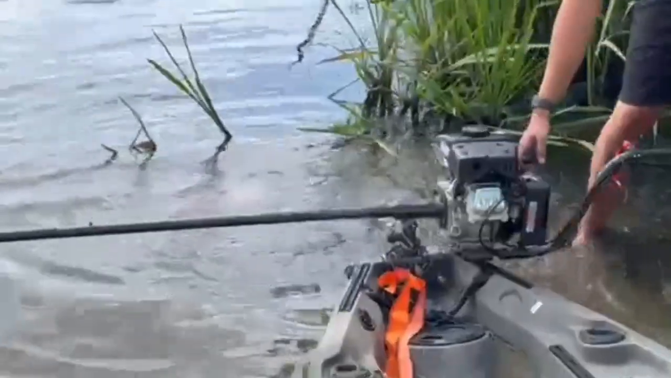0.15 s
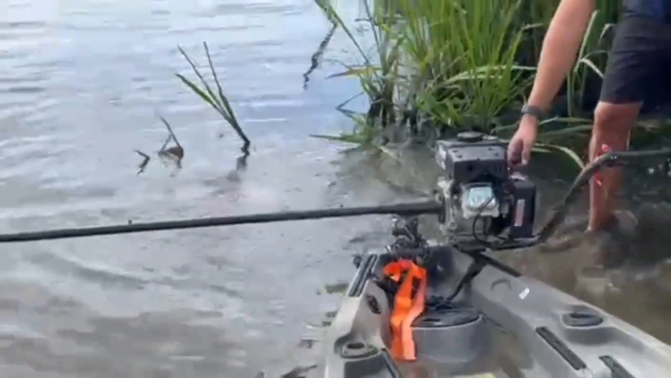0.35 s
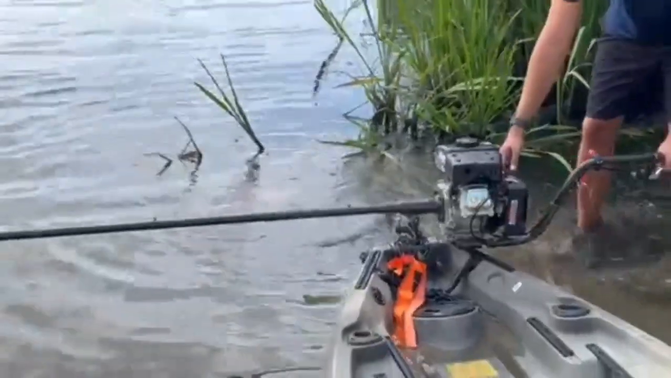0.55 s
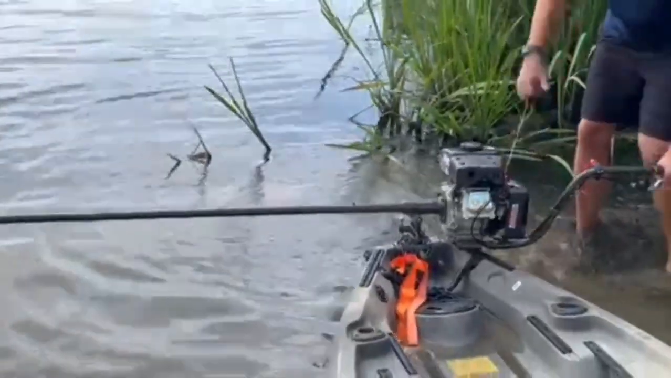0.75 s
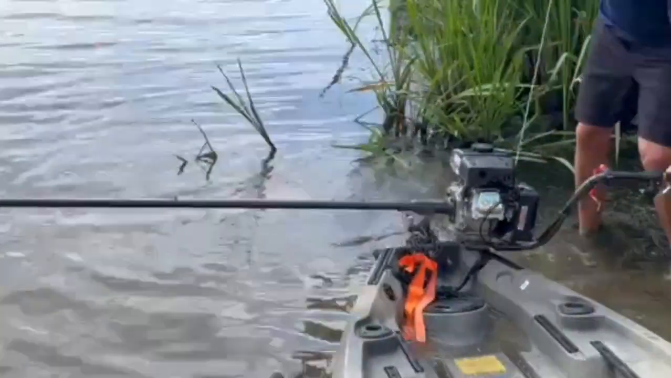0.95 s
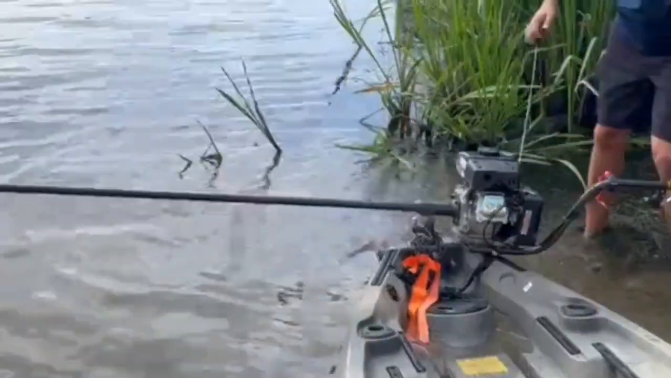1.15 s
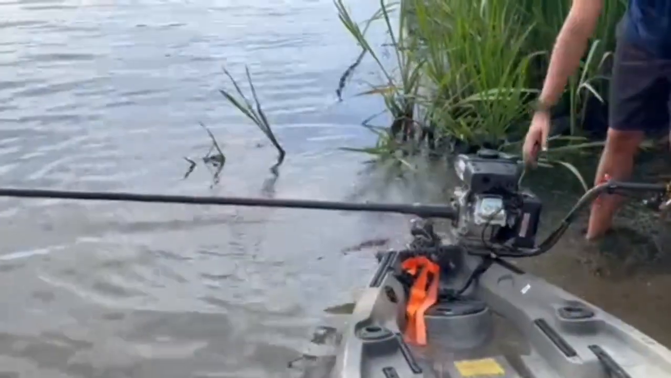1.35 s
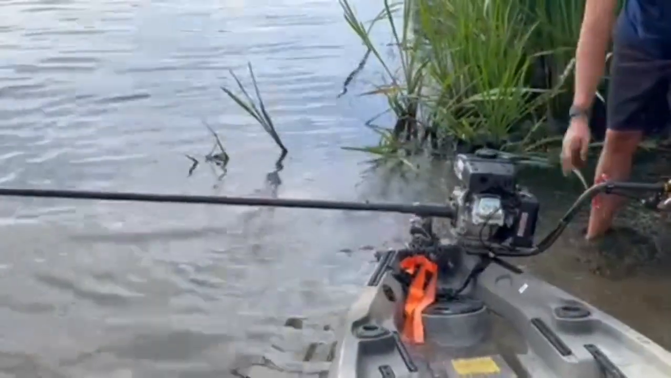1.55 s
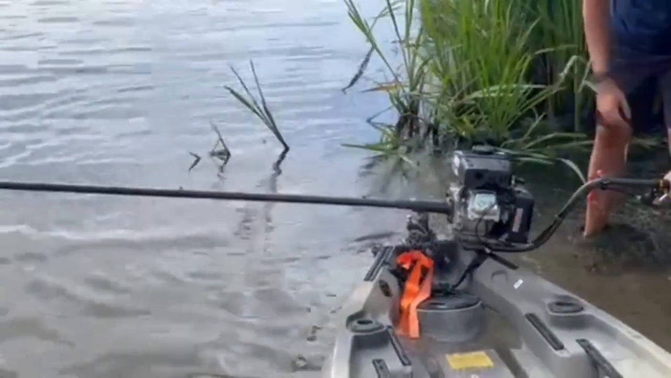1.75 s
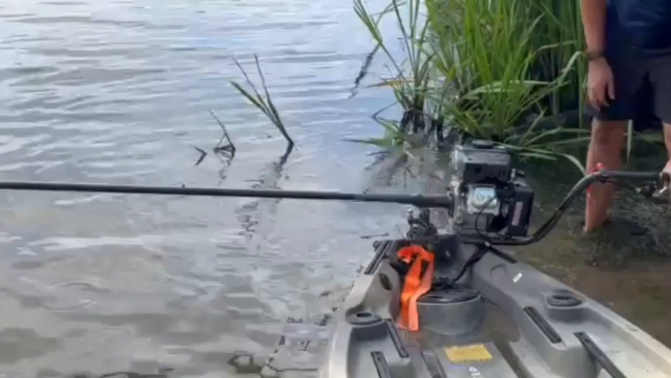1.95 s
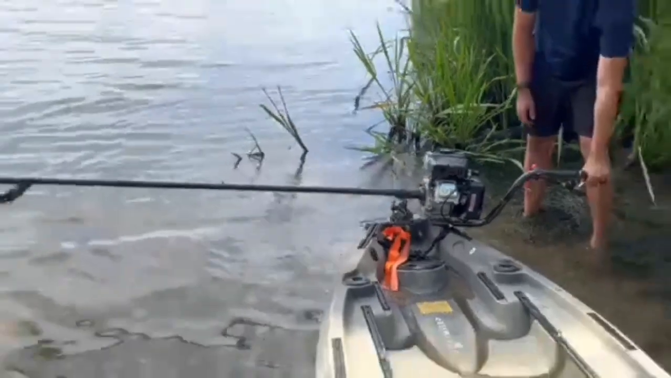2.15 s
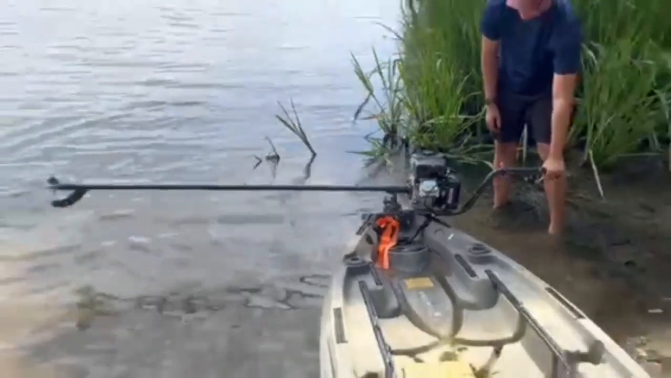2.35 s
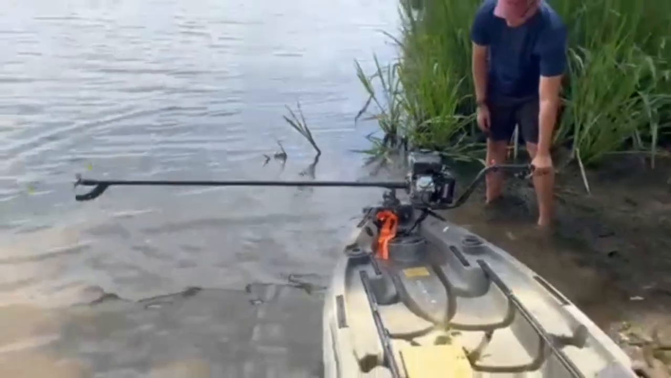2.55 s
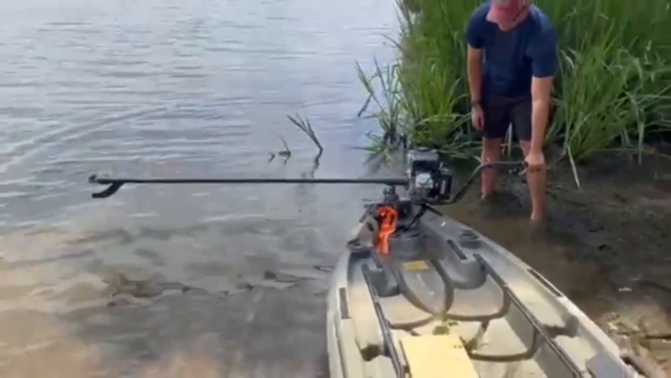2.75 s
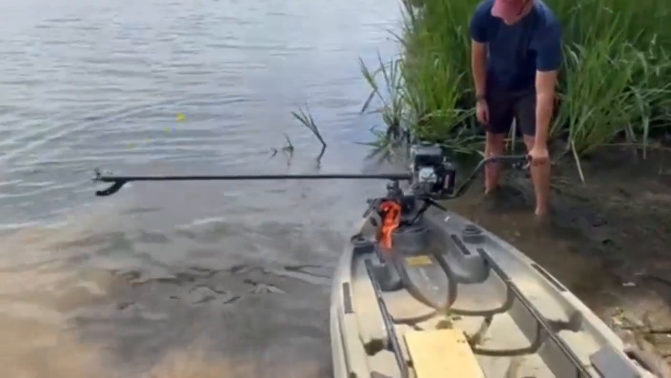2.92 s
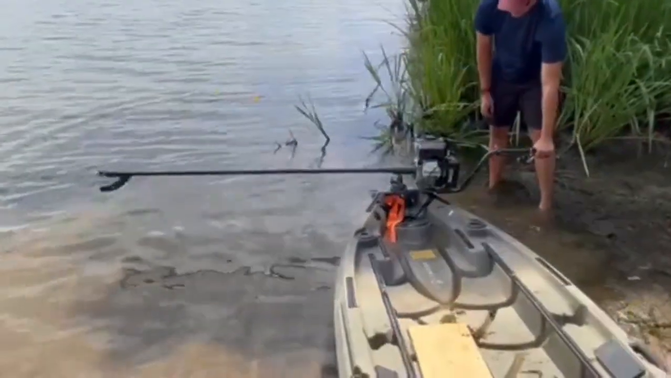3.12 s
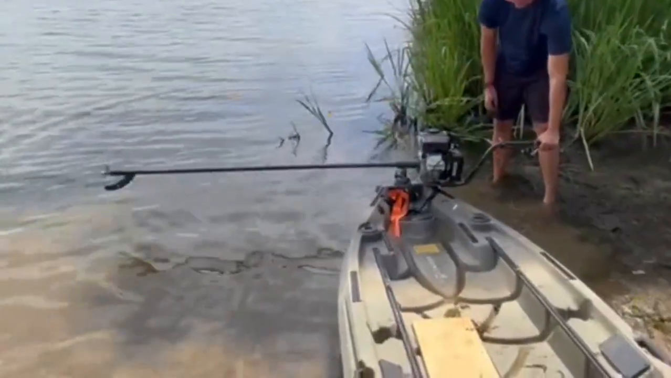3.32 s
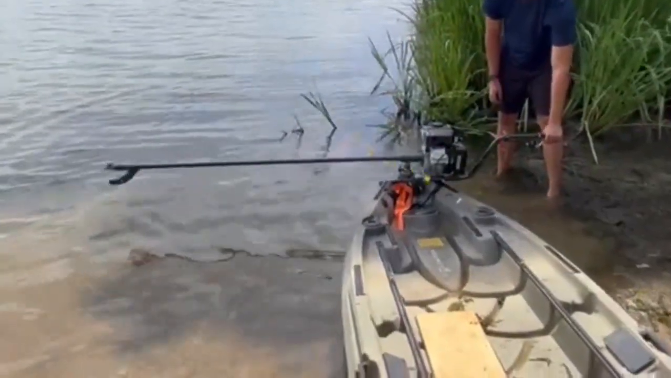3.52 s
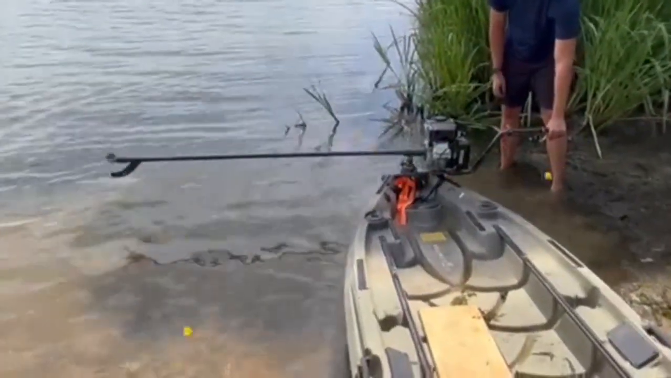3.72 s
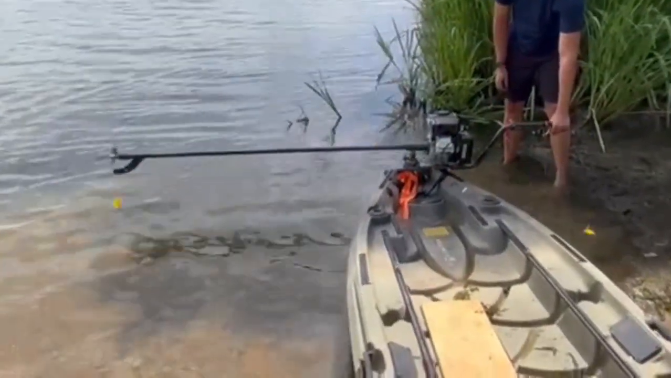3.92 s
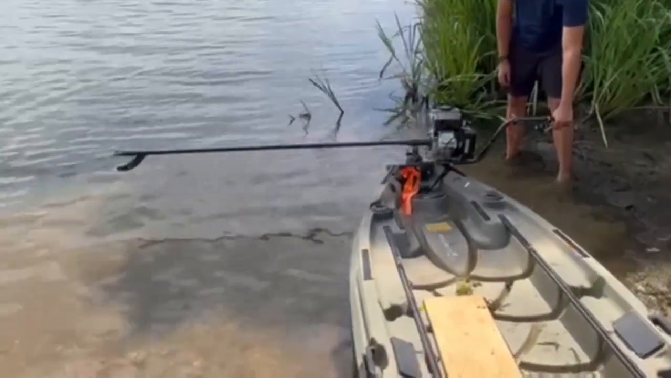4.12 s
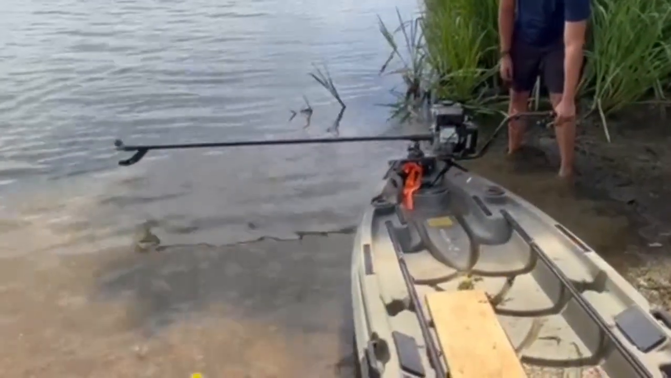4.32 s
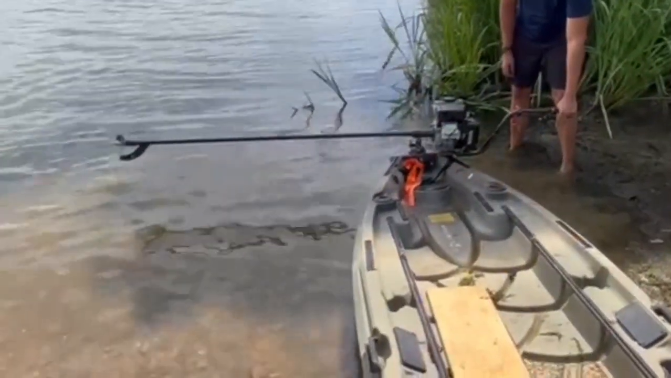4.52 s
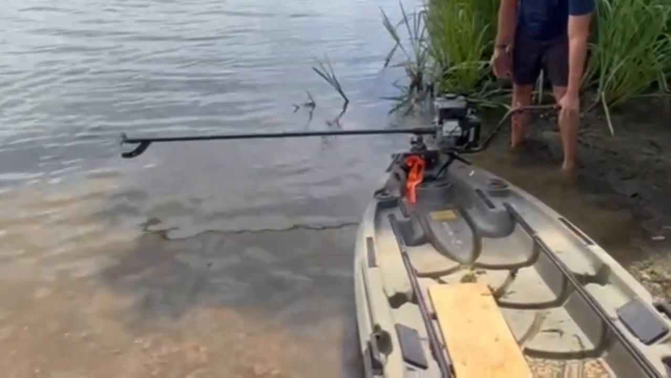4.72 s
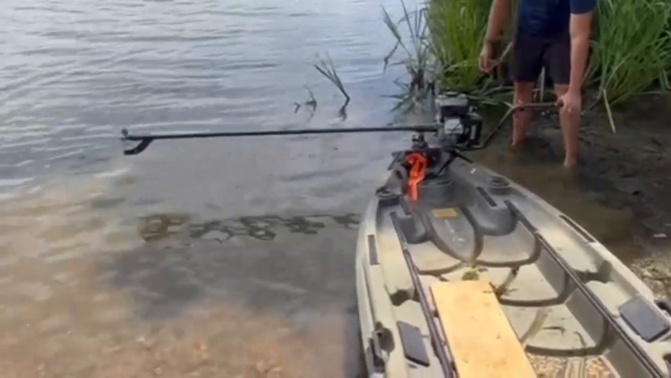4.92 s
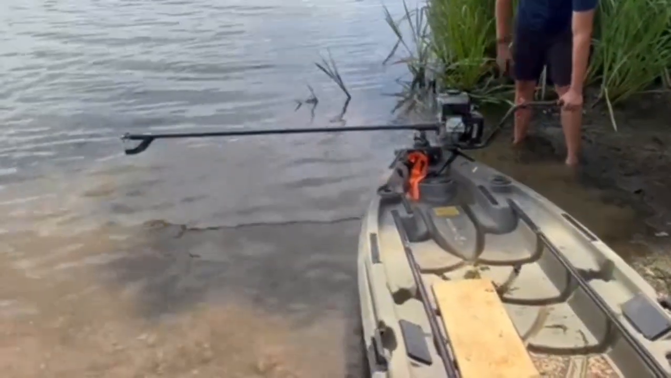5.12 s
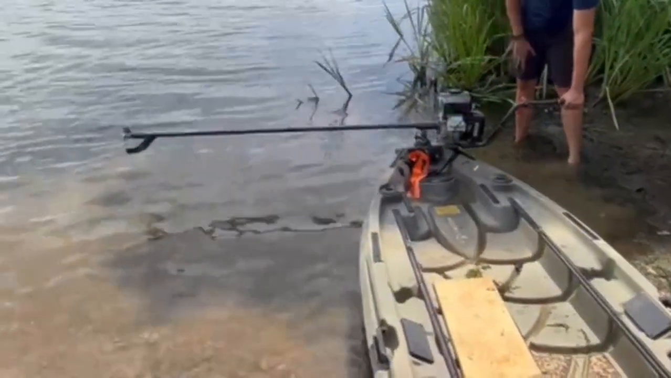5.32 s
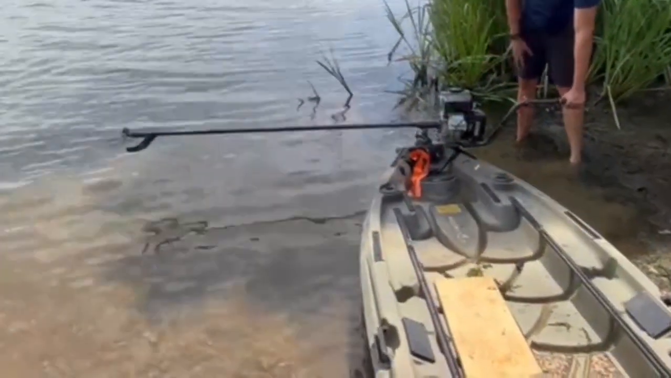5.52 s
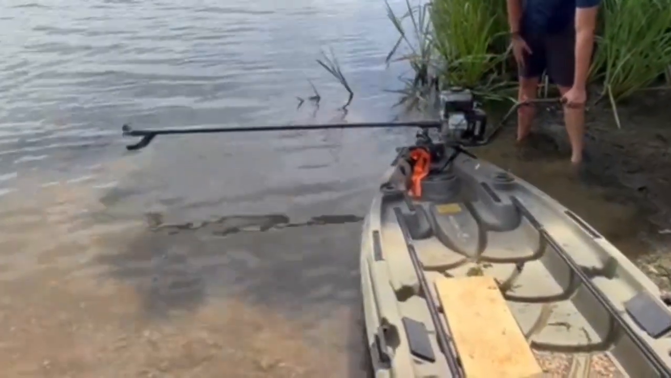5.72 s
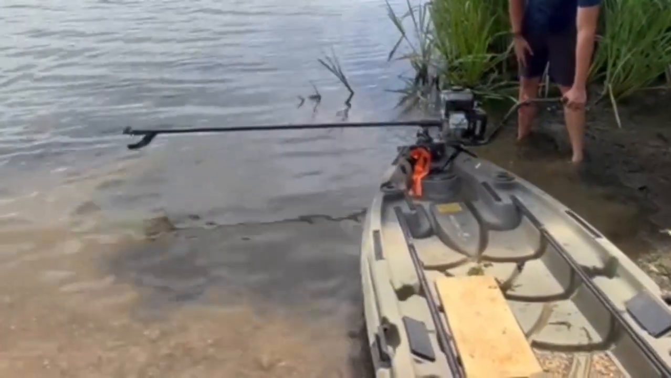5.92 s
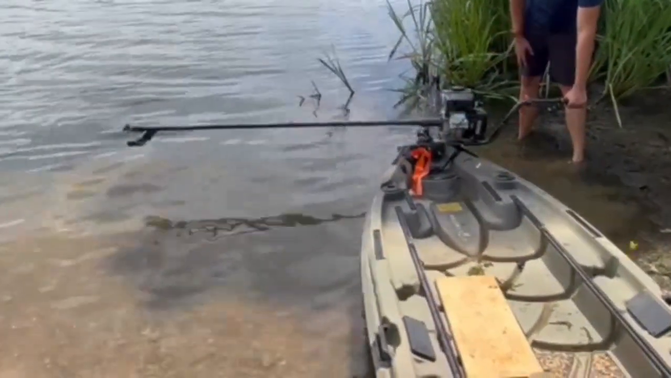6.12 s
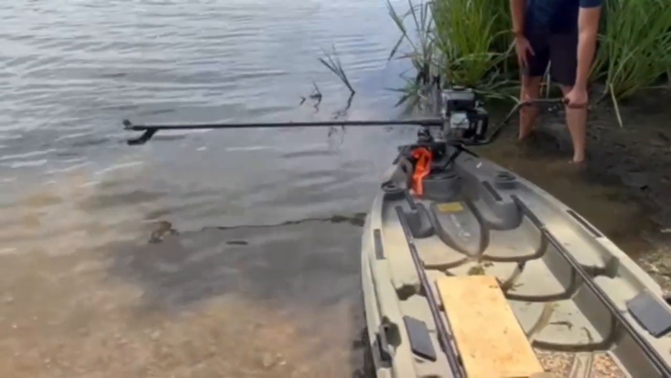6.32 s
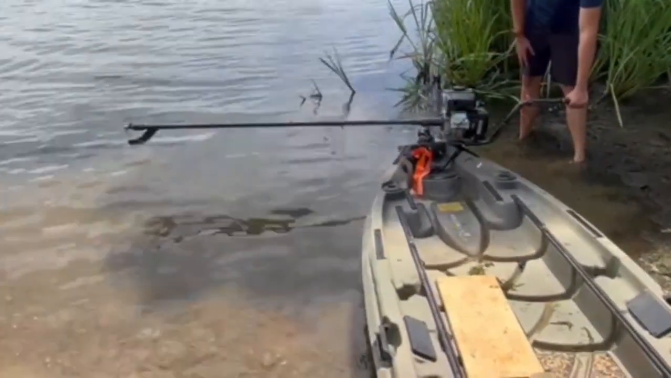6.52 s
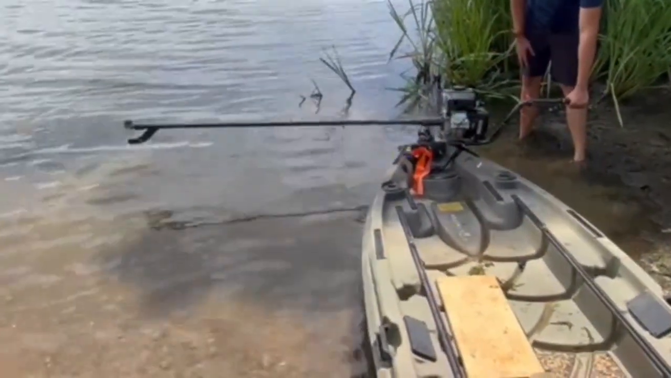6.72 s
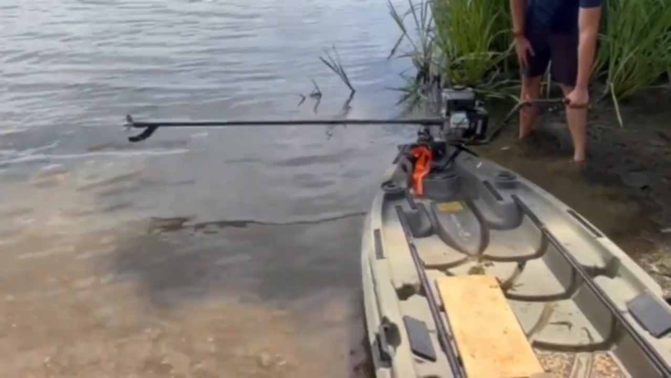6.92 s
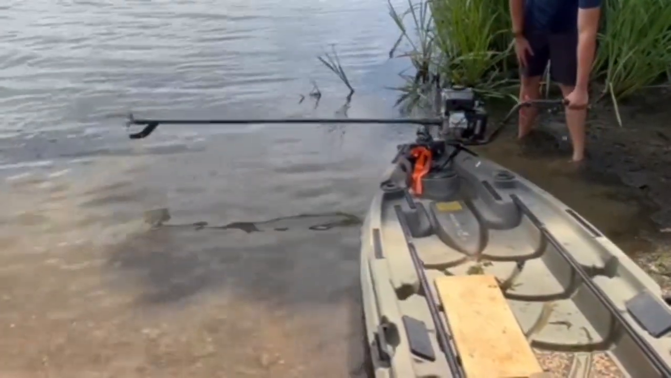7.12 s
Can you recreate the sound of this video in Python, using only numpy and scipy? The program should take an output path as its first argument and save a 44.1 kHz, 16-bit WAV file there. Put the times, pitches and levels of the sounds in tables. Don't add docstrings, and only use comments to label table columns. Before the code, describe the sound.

Water gurgles softly, a pull cord rasps, and a small single-cylinder boat engine catches, races up, holds, then drops to a popping idle.

```python
import sys
import numpy as np
from scipy import signal
from scipy.fft import rfft, irfft, next_fast_len
from scipy.io import wavfile
from scipy.ndimage import uniform_filter1d

SR = 44100
rng = np.random.default_rng(int(sys.argv[2]) if len(sys.argv) > 2 else 0)


def volts(x):
    e = np.asarray(x, float) / 20
    return 10 ** e


def output_pcm(signal):
    pcm = np.clip(np.atleast_2d(signal).T, -1, 1) * 32767
    wavfile.write(sys.argv[1], SR, np.round(pcm).astype(np.int16))


N = 315756
TIME = np.arange(N) / SR

# t/s, peak level/dB, f/Hz
BUBBLES = [(0.025, -48, 1150), (0.058, -47, 1270), (0.077, -42, 1350), (0.092, -37.5, 1000),
           (0.106, -31, 1490), (0.128, -40, 1430), (0.155, -40, 784), (0.182, -41, 1480),
           (0.263, -44, 1150), (0.286, -43, 1230), (0.517, -48, 1250), (0.562, -46, 870),
           (0.605, -47, 1050)]
# t/s, peak level/dB
TICKS = [(0.0512, -29), (0.0874, -40), (0.2578, -54), (0.2987, -49), (0.32, -34), (0.4125, -34),
         (0.4444, -50), (0.5172, -43), (0.5596, -36)]
# f/Hz, level/dB
SHORE = [(15, -47), (25, 4), (87, 7), (560, -16.5), (1020, -18), (6050, -34), (6560, -23.5), (11300, -23),
         (12500, -19), (13600, -19), (16000, -19.5)]
# start t/s, end t/s, strength/0-1
BREEZE = [(5.3, 6.6, 0.93)]
BREEZE_DB, LAP_DB, FIZZ_DB = -39, -46, -63
SPLASH_DB, SPLASH_S, SPLASH_RISE_S, SPLASH_FALL_S = -48, 0.17, 0.071, 0.061

# t/s, level/dB, brightness/dB
ROPE_GRAINS = [
    [(0.63, -66, -4), (.645, -48, -1), (0.68, -38.5, -4), (0.686, -20, -4), (.705, -25, -14),
     (0.724, -32, -9), (0.768, -33.5, -12), (0.8, -43, -4)],
    [(0.8, -35, -15), (0.81, -23, -2.5), (0.832, -27.5, -17), (.87, -26.5, -1), (0.905, -33, 0)],
    [(.905, -33, -13), (.914, -25, -5), (.927, -15, -1), (0.932, -17, -4.5), (.954, -24, 2), (.96, -21, -4),
     (0.985, -22, 0), (1.02, -35, -24)],
]
# f/Hz, level/dB
ROPE = [(120, 2.5), (200, 6.5), (450, -7.5), (750, -5), (1100, -7), (1620, -16.5), (3000, -13.5),
        (5000, -0.5)]
# t/s, peak level/dB
PAWLS = [(0.8654, -18), (0.8929, -14), (0.9204, -9), (0.9298, -4), (0.9354, -4), (0.9404, -3), (0.9494, -4),
         (0.9534, -5), (0.9814, -9), (1.0054, -14)]
# f/Hz, width/Hz, level/dB
STARTER_CUP = [(1150, 780, 2.5), (1680, 210, 20.5), (2610, 280, 14), (3270, 2000, 7), (5200, 360, 1),
               (8380, 270, 6.5)]

# t/s, rate/(firings a second)
SPEED = [(0.786, 7.93), (0.889, 9.43), (1.241, 21.6), (1.507, 36.64), (1.638, 39.57), (1.903, 36.15),
         (2.034, 37.62), (2.25, 36.76), (3.028, 36.68), (3.37, 37.39), (4.12, 26.68), (4.818, 19.86),
         (5.246, 18.21), (5.53, 18.37), (5.723, 16.96), (6.372, 18.1), (6.87, 17.96), (7.16, 17.45)]
IDLE_HZ, FULL_HZ = 18, 37
# t/s, firing delay/ms
LATE = [(1.0, -1.2), (1.3, -2.4), (1.5, .3), (1.65, -.4), (1.95, 0), (2.13, -1), (2.35, .1), (2.9, -.5),
        (3.1, .1), (3.5, -.8), (3.6, .3), (3.75, -1.5), (4.05, -.9), (4.2, .3), (4.3, -.7), (4.75, -1.3),
        (5, -.7), (6.5, -1.2)]
# t/s, level/dB
LEVEL = [(.79, -39), (.9, -30), (1, -25), (1.1, -24), (1.3, -20.5), (1.6, -22), (1.85, -24), (2, -23),
         (2.3, -26), (3.3, -27.5), (3.8, -28), (4.3, -29.5), (4.9, -32), (5.6, -31), (6, -30),
         (7.16, -29.5)]
# start t/s, end t/s, how far/0-1
WIDE_OPEN = [
    (.93, 1.02, 0.76),
    (1.02, 1.615, 1),
    (1.92, 1.94, 0.66),
    (1.94, 2.02, 0.82),
    (2.02, 2.075, 0.3),
]
# start t/s, end t/s, how far/0-1
SHUT = [
    (1.63, 1.805, 0.61),
    (1.835, 1.915, 0.5),
    (2.095, 2.2, 0.63),
    (3.54, 3.8, 0.43),
    (3.8, 4.2, 0.32),
    (4.2, 4.75, 0.24),
]
# t/s, level/dB
MISFIRES = [(1.815, -7), (2.087, -6), (3.473, 1), (3.5, -2), (3.529, 1.5), (3.56, -2), (4.514, -2),
            (4.65, -8.5), (4.794, -10), (5.538, -2), (6.891, -2.5)]
# part throttle level/dB, then what is added
# wide open/dB, shut/dB, full speed over idle/dB
POP_LAW = (2.5, -4, -7.5, 1)
THUMP_LAW = (-8, 7.5, 13, 2.65)
CLATTER_LAW = (0.032, 0.14, 0.045, 0.099)
JET_LAW = (-43.5, 13, -7, 20.5)

# f/Hz, width/Hz, level/dB
MUFFLER = [(157, 114.5, -2), (267, 103.2, 4.5), (330.6, 177.4, 3.5), (399.4, 132, 0)]
RAGGED_IDLE, RAGGED_FULL, RAGGED_UPSET = .14, .05, .1
# f/Hz, width/Hz, level/dB
TAILPIPE = [(539.5, 20.6, 0.5), (687, 30, -1), (819, 22, 7), (894.3, 27, 10.5), (1000, 82, 3),
            (1178, 67, 10), (1224, 170, 3), (1610, 27, -19), (2500, 320, -27.5), (2560, 32, -14)]
# f/Hz, width/Hz, level/dB
BARK = [(740, 220, -7.5), (1180, 450, 3.5), (1800, 530, 0.5)]
# f/Hz, width/Hz, level/dB
RASP = [(1550, 260, 7.5), (2300, 690, 10), (2580, 230, 11)]
BARK_DB, RASP_DB, RASP_TURNED_DB = -11.5, -10, 3
# f/Hz, level/dB
JET = [(410, -73), (800, 12), (1260, 14), (2220, 5.5), (2990, 7), (4430, -3), (6500, 9), (8500, -3.5),
       (12800, -8), (16000, -6.5)]

# f/Hz, width/Hz, level/dB
AIRBOX = [(87, 57, 5.4), (118.6, 65, 10.2), (149, 95, 3.3)]
IDLE_THUD_DB = -10
HULL_HZ, HULL_WIDE_HZ, MOUNT_HZ, MOUNT_WIDE_HZ = 99, 8, 53, 5

# order/(per cycle), level/dB over the engine, loudest f/Hz, width/Hz
PULLING = [(3, -10, 90, 25), (5, -7, 180, 20), (6, -6, 205, 30), (7, -9, 200, 35), (9, -6, 285, 45),
           (11, -12, 390, 50)]
OVERRUN = [(3, -5, 103, 10), (7, -6, 240, 20), (8, -7, 270, 22), (8, -4, 200, 12), (11, -8, 280, 20),
           (13, -12, 430, 35)]
CRUISING = [(8, -11, 295, 40), (9, -11, 330, 40), (10, -11, 370, 40), (11, -14, 405, 40),
            (14, -21, 520, 40), (17, -21, 625, 40), (19, -19, 700, 45), (20, -21, 740, 45),
            (21, -22, 775, 45), (23, -18, 850, 50), (25, -19, 920, 50)]
IDLING_S = 5

# time after the pop/(share of the cycle), level/dB
BLOWS = [(.97, 0), (.2, -7), (.33, -2), (.47, -5), (.62, -6)]
# f/Hz, width/Hz, level/dB
COWLING = [(1000, 190, -8.5), (1129, 57, 3.5), (1308, 34, 5.5), (1643, 196, 0.5), (2380, 74, 4.5),
           (2682, 20, 10), (3130, 86, 3), (3320, 48, 9), (3970, 64, 3), (4530, 340, 1), (5170, 45, 2),
           (8590, 64, -3)]
# f/Hz, level/dB
METAL = [(260, -11), (450, -13.5), (820, -16), (1080, -10), (2000, -21.5), (3350, -29), (3700, -35),
         (6400, -29), (7800, -29), (9000, -40), (13000, -38), (16000, -64)]

# start t/s, end t/s, how far/0-1
TURNED = [(2.6, 3.6, 1)]
# f/Hz, level/dB
TURNED_TREBLE = [(2600, 0.5), (3000, -0.5), (5600, -0.5), (6300, 3.5)]
# start t/s, end t/s, how far/0-1
CLOSE = [(1.6, 2.4, 0.96)]
# f/Hz, level/dB
GLARE = [(3300, 0.5), (3700, 4.5), (5600, 1.5), (6200, 1)]
# f/Hz, step/(half turns)
PORTS = [(300, 0), (1000, .15), (1800, .45), (2500, .04), (5300, .04), (6300, 1), (6800, 1), (7700, 2),
         (10400, 2), (11600, 3), (13900, 3), (15000, 4)]
# f/Hz, level/dB
SPREAD = [(100, -24), (500, -37), (1500, -73), (2300, -27), (2800, -79), (5300, -56), (7000, -52),
          (8100, 2), (8600, -55), (16000, -55)]
# f/Hz, level/dB
SPREAD_FAR = [(300, -22), (1000, -13.5), (2500, -6), (5500, 1), (8000, -11), (8500, -40), (16000, -50)]
# f/Hz, level/dB
LEAN = [(60, -2.5), (200, -2.1), (400, -1.7), (1300, -3.9), (2300, -1.2), (4000, -.5), (5600, -.2),
        (16000, -.2)]
FILL_DB, FILL_WIDE_DB, FILL_TURNED_DB = -24, 15, 15


def noise():
    return rng.standard_normal(N)


def unit(x):
    return x / np.sqrt(np.mean(x ** 2) + 1e-20)


def levelled(x):
    return x / np.sqrt(np.abs(uniform_filter1d(x ** 2, size=SR // 6)) + 1e-12)


def later(x, delay_s):
    return np.roll(x, round(delay_s * SR))


def along(points, hz):
    f, v = np.transpose(points)
    return np.interp(np.log(hz + 1), np.log(f + 1), v)


def curves(rows):
    s, *cols = np.transpose(rows)
    return [np.interp(TIME, s, c) for c in cols]


def during(rows):
    return uniform_filter1d(1. * (TIME > rows[0][0]) * (TIME <= rows[-1][0]), size=300)


def spans(rows, edge_s):
    moved = sum(far * (TIME > start) * (TIME <= end) for start, end, far in rows)
    return uniform_filter1d(1. * moved, size=round(edge_s * SR))


def filtered(x, response):
    m = next_fast_len(N + SR // 2)
    return irfft(rfft(x, m) * response(np.fft.rfftfreq(m, 1 / SR)), m)[..., :N]


def resonant(x, modes):
    def response(f):
        return sum((-1) ** k * volts(db) * 1j * f * w / (c * c - f * f + 1j * f * w)
                   for k, (c, w, db) in enumerate(modes))
    return filtered(x, response)


def coloured(x, spectrum):
    return filtered(x, lambda hz: volts(along(spectrum, hz)))


def burst(impulses, rise_s, fall_s, lead_s):
    t = np.arange(SR // 8) / SR
    shape = (1 - np.exp(-t / rise_s)) * np.exp(-t / fall_s)
    return signal.fftconvolve(impulses, shape)[round(lead_s * SR):][:N]


def pings(impulses, count, low_hz, high_hz, t60_s, spread_s):
    at = np.repeat(np.flatnonzero(impulses > .15 * impulses.max()), count)
    luck, k = rng.random((len(at), 3)), np.arange(360)
    hz = low_hz * (high_hz / low_hz) ** luck[:, :1]
    size = impulses[at][:, None] * (.3 + luck[:, 1:2] ** 2) * np.sqrt(hz / low_hz)
    decay = volts(-60 * k / SR / t60_s) * (1 - np.exp(-k / 40))
    rings = size * np.sin(2 * np.pi * hz * k / SR) * decay
    index = (at + np.round(luck[:, 2] * spread_s * SR).astype(int))[:, None] + k
    return unit(np.bincount(index.ravel(), rings.ravel(), N + SR)[:N])


def train(share, scatter_db, jitter_s):
    s = TIME[round(SPEED[0][0] * SR)::10]
    cycle = np.cumsum(np.interp(s, *np.transpose(SPEED))) * 10 / SR
    luck = rng.standard_normal((int(cycle[-1]) + 1, 2))
    when = np.interp(np.arange(len(luck)) + share, cycle, s, right=2 * N / SR)
    when = when + np.interp(when, *np.transpose(LATE)) / 1000
    index = np.round((when + jitter_s * luck[:, 0]) * SR).astype(int)
    return np.bincount(np.minimum(index, N), volts(scatter_db * luck[:, 1]), N + 1)[:N]


def controls():
    pace = (curves(SPEED)[0] - IDLE_HZ) / (FULL_HZ - IDLE_HZ)
    return spans(WIDE_OPEN, edge_s=0.016), spans(SHUT, edge_s=.03), np.clip(pace, 0, 1)


def bubbles():
    out, t = np.zeros(N), np.arange(SR // 16) / SR
    for s, db, hz in BUBBLES:
        chirp = np.sin(2 * np.pi * hz * (.93 * t + 3.7 * t * t)) * (1 - np.exp(-t / 0.00043))
        film = 0.3 * volts(-60 * t / .006) * rng.standard_normal(len(t))
        out[round(s * SR):][:len(t)] += volts(db - 60 * t / 0.051) * (chirp + film)
    return out


def droplets():
    ticks, t = np.zeros(N), np.arange(SR // 16) / SR
    for s, db in TICKS:
        ticks[round(s * SR):][:len(t)] += volts(db - 5.5 - 60 * t / 0.018) * rng.standard_normal(len(t))
    return resonant(ticks, [(1900, 3500, 0.1)])


def water():
    flicker = volts(2.0 * unit(uniform_filter1d(noise(), size=500)))
    side_s = np.where(TIME < SPLASH_S, SPLASH_RISE_S, SPLASH_FALL_S)
    splash = np.exp(-np.abs(TIME - SPLASH_S) / side_s)
    fizz = unit(resonant(flicker * noise(), [(1480, 400, 15), (3200, 11000, -4.0)]))
    lap = unit(flicker * coloured(noise(), SHORE))
    buffet = spans(BREEZE, edge_s=0.58) * flicker * unit(resonant(noise(), [(75, 28, 0)]))
    surface = volts(LAP_DB) * lap + (volts(FIZZ_DB) + volts(SPLASH_DB) * splash) * fizz
    return bubbles() + droplets() + surface + volts(BREEZE_DB) * buffet


def starter():
    grit = rng.standard_normal((2, N)) * volts(1.7 * unit(uniform_filter1d(noise(), size=90)))
    grit = grit + 1.44 * resonant(grit, STARTER_CUP)
    low = unit(filtered(coloured(grit[0], ROPE), lambda hz: 1 / (1 + (hz / 3700) ** 6)))
    high = unit(filtered(coloured(grit[1], JET), lambda hz: 1 - 1 / (1 + (hz / 3900) ** 6)))
    rasp = np.zeros(N)
    for rows in ROPE_GRAINS:
        level_db, bright_db = curves(rows)
        rasp += during(rows) * volts(level_db) * (low + volts(bright_db) * high)
    strikes = np.zeros(N)
    for s, db in PAWLS:
        strikes[round(s * SR)] = volts(db)
    blows = burst(strikes, rise_s=0.00032, fall_s=0.0037, lead_s=0)
    knock = blows * unit(resonant(noise(), STARTER_CUP))
    return rasp + volts(-6) * np.pad(knock, (0, N - len(knock)))


def muffler_pop(early, rough):
    wide, shut, _ = controls()
    echo = volts(-16.5) * later(early, 0.00976)
    second_pulse = 0.34 * np.sqrt(np.abs(shut)) + 0.6 * wide
    echo = echo + second_pulse * later(early, 0.01119)

    def outer_chamber(hz):
        return 1j * hz * 380 / (270 ** 2 - hz * hz + 1j * hz * 380) / (1 + 1j * hz / 600)

    push = filtered(resonant(-np.diff(early + echo, prepend=0), MUFFLER), outer_chamber)
    turbulence = filtered(resonant(noise(), MUFFLER), outer_chamber)
    return levelled(levelled(push) + rough * unit(turbulence))


def tailpipe_song(early):
    wide, shut, _ = controls()
    baffles = np.cumsum(rng.uniform(-1.6, .2, 600))
    smeared = filtered(np.roll(early, 40), lambda hz: np.exp(1j * np.interp(hz, np.arange(600) * 40, baffles)))
    speed = curves(SPEED)[0] / 37
    song = volts(-4.5) * speed ** 2 * levelled(resonant(smeared, TAILPIPE))
    strained = levelled(resonant(smeared, [(472, 52, 0)]))
    return song * (1 - 0.077 * shut) + volts(-7.5) * (wide + 1.7 * shut) * strained


def outlet(fire):
    wide, shut, pace = controls()
    gusts = burst(fire, rise_s=.001, fall_s=.004, lead_s=.004) + .1
    rasp = levelled(resonant(gusts * noise(), RASP))
    coughs = burst(fire, rise_s=.002, fall_s=.005, lead_s=.007)
    bark = levelled(resonant(coughs * noise(), BARK))
    rasp_db = RASP_DB + RASP_TURNED_DB * spans(TURNED, edge_s=0.8)
    return volts(BARK_DB) * (1 - pace) * bark + volts(rasp_db) * pace * (1 - shut) * (1 - wide) * rasp


def gas_jet():
    puffs = train(.9, scatter_db=1.8, jitter_s=.0004)
    gate = burst(puffs, rise_s=.0005, fall_s=.003, lead_s=.0018)
    rattle = .8 * pings(np.roll(puffs, -70), count=14, low_hz=1000, high_hz=15000, t60_s=.016, spread_s=.003)
    return levelled(coloured(unit((gate + 0.092) * noise()) + rattle, JET))


def exhaust(pop_db, jet_db, rough):
    fire = train(0, scatter_db=1.4, jitter_s=.00007)
    for s, db in MISFIRES:
        fire = fire * volts(db * (np.abs(TIME - s) < .01))
    early = later(fire, -.006)
    voice = muffler_pop(early, rough) + tailpipe_song(early) + outlet(fire)
    return volts(pop_db - 1.0) * voice + volts(jet_db + 13.0) * gas_jet()


def intake(thump_db):
    wide, shut, pace = controls()
    gulp = train(.47, scatter_db=1.5, jitter_s=.0004) + volts(-6.5) * train(.97, scatter_db=1.5, jitter_s=.0004)
    gulp = later(gulp, -.015) * (.35 + .65 * pace)
    thud = volts(IDLE_THUD_DB) * (1 - pace) ** 2 * later(train(0, scatter_db=2, jitter_s=.0003), -.009)
    kick = 0.52 * wide * train(0.92, scatter_db=5.5, jitter_s=0.0018)
    push = gulp * (1 - 0.15 * wide) + thud + kick
    boom = levelled(resonant(resonant(push, AIRBOX), [(125, 1000, 0)]))
    rumble = unit(resonant(resonant(noise(), AIRBOX), [(97.0, 290, 0)]))

    speed = curves(SPEED)[0]
    turn = 4 * np.pi * np.cumsum(speed) / SR
    rocking = np.sin(turn) + shut * pace ** 4 * np.sin(2 * turn)

    def passing(order, hz, width_hz):
        return 1 / (1 + ((order * speed - hz) / width_hz) ** 2)

    hull = -2.5 * passing(3, HULL_HZ, HULL_WIDE_HZ) * np.sin(1.5 * turn)
    mount = 3.5 * passing(2, MOUNT_HZ, MOUNT_WIDE_HZ) * np.sin(turn)
    rocking += np.sqrt(np.abs(shut)) * (hull + mount)
    return volts(thump_db + .3) * levelled(boom + .35 * rumble + .5 * rocking)


def crank_orders():
    speed, late_ms = curves(SPEED)[0], curves(LATE)[0]
    cycle = np.interp(TIME - late_ms / 1000, TIME, 2 * np.pi * np.cumsum(speed) / SR)
    wide, shut, pace = controls()
    steady = np.clip(1 - wide - 2 * shut, 0, 1) * pace * (TIME < IDLING_S)
    mix = np.zeros(N)
    for share, rows in ((wide, PULLING), (np.sqrt(np.abs(shut)), OVERRUN), (steady, CRUISING)):
        on = share > .01
        for order, db, hz, width_hz in rows:
            off = np.square((order * speed[on] - hz) / width_hz)
            mix[on] += share[on] * volts(db) * np.sin(order * (cycle[on] + order)) / (1 + off * off)
    return volts(curves(LEVEL)[0] + 3) * mix


def tappets():
    taps = train(.22, scatter_db=2, jitter_s=.0015) + volts(-14) * train(.47, scatter_db=2, jitter_s=.001)
    tick = burst(taps, rise_s=.003, fall_s=.006, lead_s=.001) * noise()
    tick = resonant(tick, [(1200, 300, 5), (2400, 500, 6), (4700, 600, -9), (7600, 900, -4)])
    return levelled(resonant(tick, [(5000, 9000, 0)]))


def clatter(clatter_db):
    blows = sum(volts(db) * train(share, scatter_db=2.5, jitter_s=.001) for share, db in BLOWS)
    shake = (burst(blows, rise_s=.002, fall_s=.008, lead_s=.004) + .46) * rng.standard_normal((2, N))
    rattle = .3 * pings(blows, count=14, low_hz=1500, high_hz=15000, t60_s=.045, spread_s=.015)
    ringing = unit(shake[0]) + rattle + 1.76 * resonant(unit(shake[1]), COWLING)
    tick_db = -11 - 10 * controls()[2]
    return volts(clatter_db + .3) * (levelled(coloured(ringing, METAL)) + volts(tick_db) * tappets())


def engine():
    wide, shut, pace = controls()
    loudness_db = curves(LEVEL)[0]

    def layer_db(law):
        part, when_wide, when_shut, when_fast = law
        return loudness_db + part + when_wide * wide + when_shut * shut + when_fast * np.maximum(pace, wide)

    upset = np.clip(wide + 1.5 * shut, 0, 1)
    rough = RAGGED_IDLE + (RAGGED_FULL - RAGGED_IDLE) * pace + RAGGED_UPSET * upset
    running = exhaust(layer_db(POP_LAW), layer_db(JET_LAW), rough) + intake(layer_db(THUMP_LAW)) + crank_orders()
    caught = np.clip((TIME - .95) / 0.049, 0, 1)
    return (TIME > .77) * (running + caught * clatter(layer_db(CLATTER_LAW)))


def scene():
    near = water() + starter() + engine()
    near += spans(TURNED, edge_s=0.45) * filtered(near, lambda hz: volts(along(TURNED_TREBLE, hz)) - 1)
    near += spans(CLOSE, edge_s=0.13) * filtered(near, lambda hz: volts(along(GLARE, hz)) - 1)
    phases = np.cumsum(rng.normal(0, 2.5, 2400))

    def scatter(hz):
        return np.exp(1j * np.interp(hz, np.arange(2400) * 10, phases))

    def half_step(hz):
        return along(PORTS, hz) * np.pi / 2

    unlike = filtered(near, lambda hz: volts(along(SPREAD, hz)) * scatter(hz) - 1j * np.sin(half_step(hz)))
    back = np.clip((TIME - 2.35) / 0.36, 0, 1)
    unlike += back * filtered(near, lambda hz: volts(along(SPREAD_FAR, hz)) * scatter(hz + 500))

    def cancelled(hz):
        return np.sin(half_step(hz)) ** 2 * (hz > 4000) / (1 + (hz / 11500) ** 8)

    fill_db = FILL_DB + FILL_WIDE_DB * controls()[0] + FILL_TURNED_DB * spans(TURNED, edge_s=.15)
    alike = filtered(near, lambda hz: np.cos(half_step(hz)))
    alike += volts(fill_db) * filtered(near, cancelled)
    ports = np.array([alike + unlike, alike - unlike])
    return filtered(ports, lambda hz: volts(np.outer([.5, -.5], along(LEAN, hz))))


def band_limit(x):
    return signal.sosfilt(signal.butter(12, 16830, fs=SR, output="sos"), x)


def record(dry):
    cut = filtered(dry, lambda hz: (1j * hz / 40 / (1 + 1j * hz / 40)) ** 3)
    soft = cut / (1 + np.abs(cut / .95) ** 4) ** (1 / 4)
    limited = filtered(soft, lambda hz: hz < 15900)
    return band_limit(limited)


dry = scene()
out = record(dry)
output_pcm(out)
```